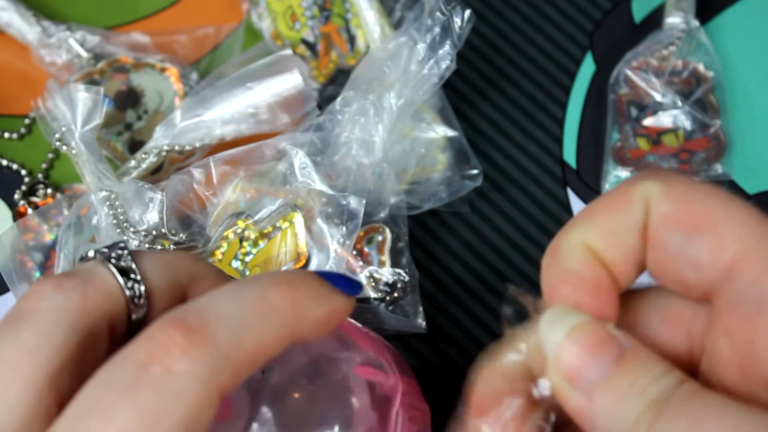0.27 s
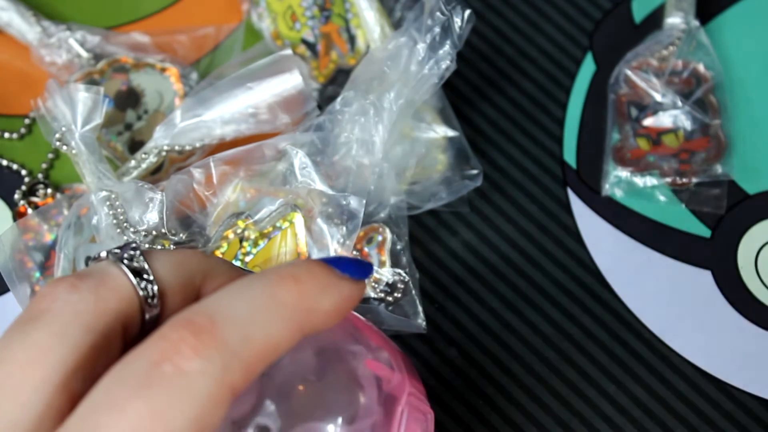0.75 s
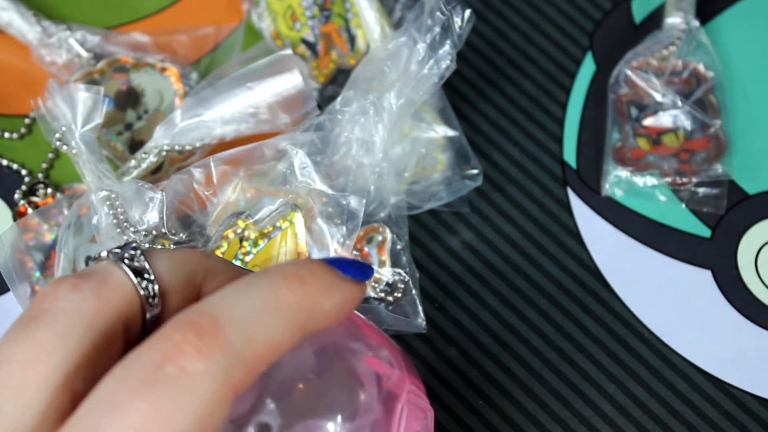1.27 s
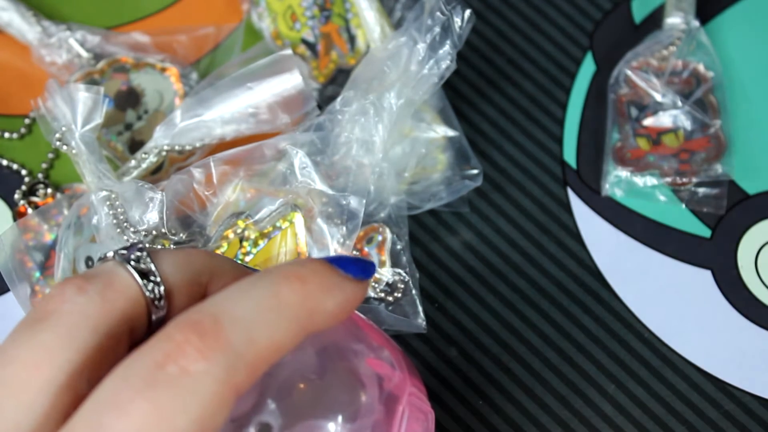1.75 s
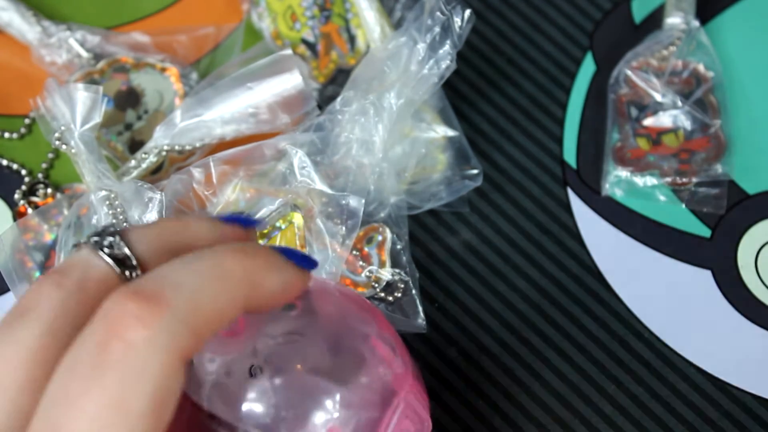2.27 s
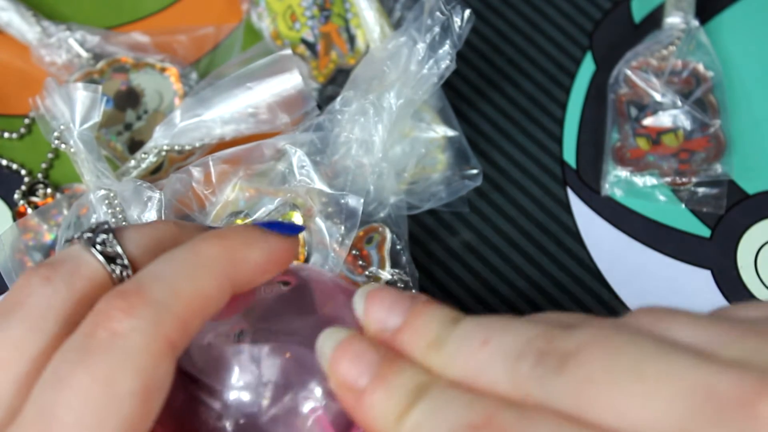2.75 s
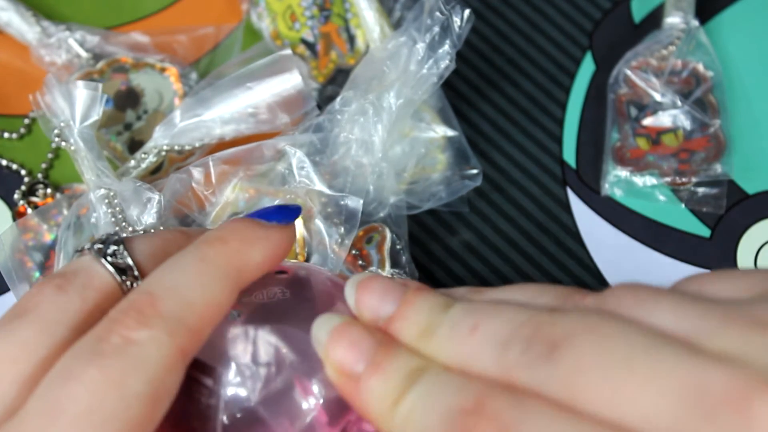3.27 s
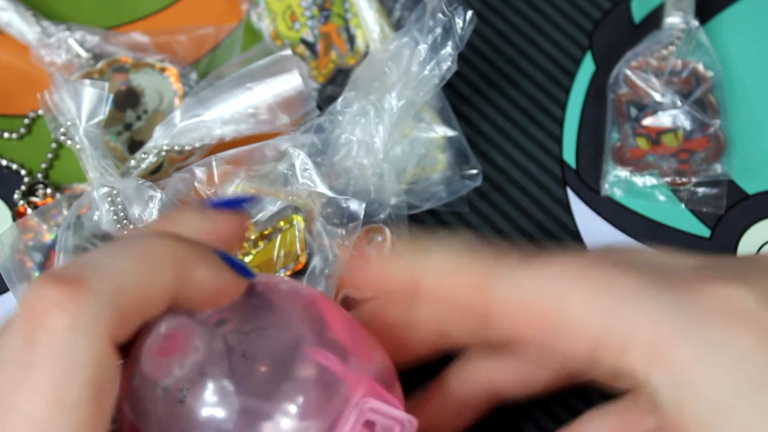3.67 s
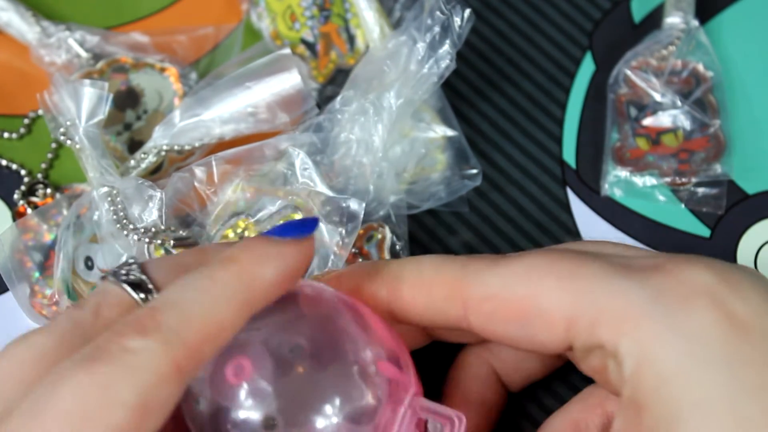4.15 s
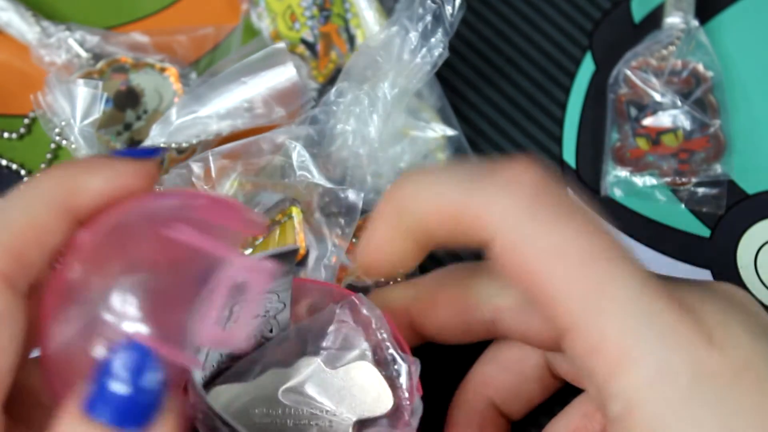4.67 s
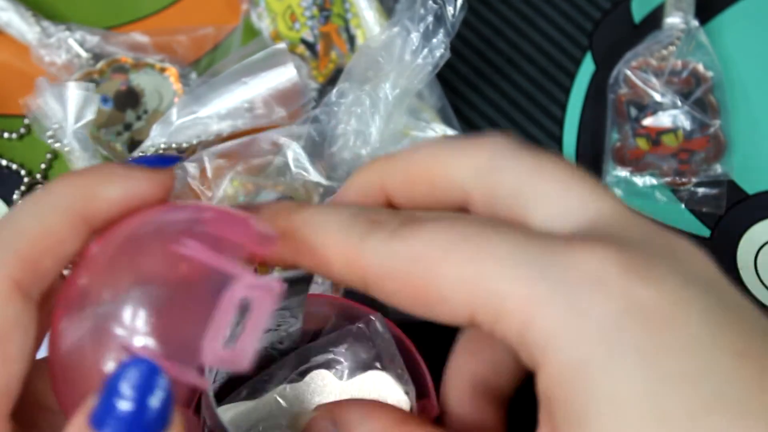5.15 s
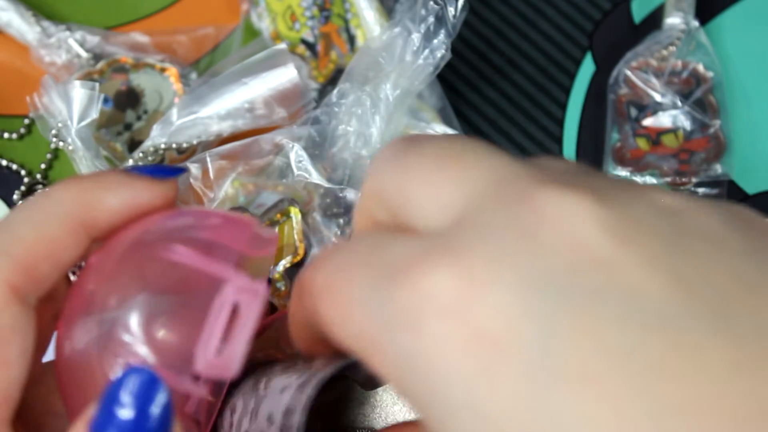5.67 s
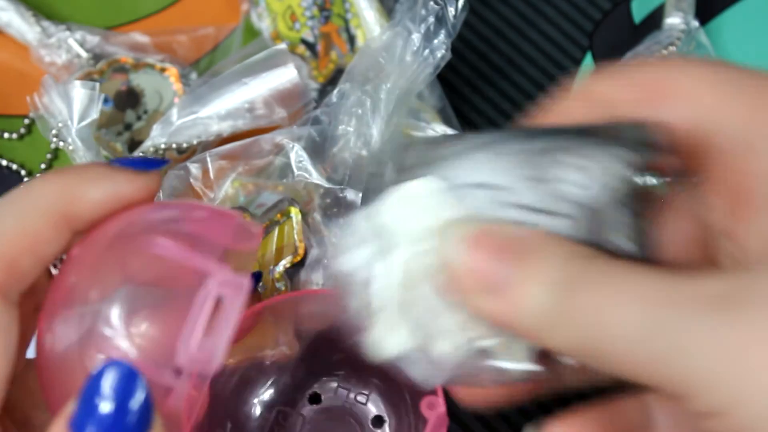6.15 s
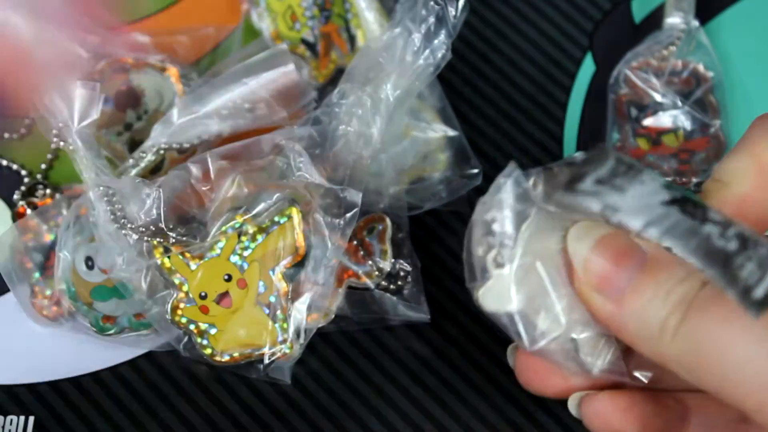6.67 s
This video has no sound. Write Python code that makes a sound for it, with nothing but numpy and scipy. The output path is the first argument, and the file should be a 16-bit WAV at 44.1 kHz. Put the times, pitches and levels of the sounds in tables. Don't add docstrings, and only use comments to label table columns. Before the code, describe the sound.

Close-up hands crackle thin film, knock and pop open a hard hollow plastic shell, then rustle a crinkly packet free in a quiet room.

```python
import sys
import numpy as np
from scipy import signal
from scipy.fft import rfft, irfft
from scipy.io import wavfile
from scipy.ndimage import uniform_filter1d

SR = 44100
rng = np.random.default_rng(int(sys.argv[2]) if len(sys.argv) > 2 else 0)


def dump_mix(stems):
    frames = np.atleast_2d(stems).T
    limited = np.clip(frames, -1, 1)
    pcm = np.round(limited * 32767).astype(np.int16)
    wavfile.write(sys.argv[1], SR, pcm)


def elevation(decibels):
    levels = np.asarray(decibels, float)
    return 10 ** (levels / 20)


N = 304466

# freq_hz, density_db_per_hz
HISS_SPECTRUM = [(12, -31), (22, -13), (33, -11), (45, -18), (96, -14.5), (134, -10), (204, -16),
                 (248, -13), (377, -14.5), (558, -13), (1260, -15), (3440, -17), (4060, -17.5),
                 (16000, -29.5)]
HISS_DB = -56.5
DC_OFFSET = 0.001
# start_s, end_s, pitch_hz, rms_db
WHISTLES = [
    (1.84, 1.96, 3140, -73),
    (1.97, 2.13, 3360, -72),
]

# delay_s, level_db
ECHOES = [(.0024, -6), (.0051, -12.5), (0.0115, -15.5), (.019, -20)]
# centre_hz, t60_s, level_db
ROOM_TAIL = [(250, 0.48, -22.5), (900, 0.23, -23), (2550, 0.24, -20), (7360, 0.29, -21.5),
             (13000, 0.16, -68)]

# start_s, peak_db, centre_hz, length_s
MAT_THUMPS = [(0.251, -35, 396, 0.067), (0.617, -28, 443, 0.065), (0.638, -32, 680, 0.12),
              (0.679, -45, 235, 0.059), (1.016, -48.5, 190, 0.035), (1.355, -36, 650, 0.068),
              (1.552, -41, 217, 0.026), (1.555, -40, 604, 0.05), (2.537, -43, 553, 0.16),
              (2.598, -47, 110, 0.13), (2.72, -36.5, 623, 0.025), (3.106, -22, 593, 0.014),
              (3.895, -47, 333, 0.37), (4.074, -30, 500, 0.013), (5.035, -26, 495, 0.026),
              (5.241, -38, 483, 0.061), (6.198, -56, 112, 0.089), (6.29, -36, 374, 0.12),
              (6.318, -35, 402, 0.045), (6.5, -46.5, 297, 0.13), (6.765, -46.5, 310, 0.052)]
# start_s, peak_db, centre_hz, length_s
TABLE_THUDS = [(0.623, -41.5, 117, 0.059), (2.716, -51, 96.9, 0.085), (3.102, -38.5, 125, 0.092),
               (4.073, -56, 112, 0.048), (4.215, -55, 94, 0.068), (5.03, -49.5, 126, 0.12),
               (5.26, -53, 119, 0.12), (1.56, -51, 169, 0.032), (.27, -53, 150, 0.033),
               (3.27, -55, 110, 0.048), (6.313, -42, 84, 0.12), (6.799, -54.5, 134, 0.085),
               (2.95, -55, 75, 0.06), (3.11, -57, 250, 0.32)]
# mode_hz, width_hz, level_db
TABLE_MODES = [(123, 16, 3), (241, 7.6, 8.5), (500, 88, -5.5)]

# middle_s, length_s, level_db
SLIDE_STROKES = [
    (6.3, 0.5, -49.5),
]
# mode_hz, width_hz, level_db
SLIDE_MODES = [(547, 32, 0.5), (1590, 100, -4.5), (1910, 60, -1.5), (2400, 61, -8), (3310, 83, -9)]

# middle_s, length_s, level_db
DRAG_STROKES = [(.26, 0.22, -60), (.62, 0.2, -52.5), (.93, 0.99, -60), (1.27, 0.45, -78),
                (1.6, 0.16, -58.5), (2.75, 1, -63), (3.45, 0.77, -52.5), (3.92, 0.26, -57),
                (4.17, 0.31, -52), (4.6, 0.43, -69), (5.09, 0.25, -49.5), (5.3, 0.18, -74),
                (5.8, 0.66, -46), (6.3, 0.58, -51), (6.85, 0.27, -63)]
# middle_s, length_s, level_db
CRUMPLE_STROKES = [(.04, 0.74, -51.5), (.34, 0.19, -42.5), (.6, 0.32, -44.5), (.95, 0.12, -39.5),
                   (1.08, 0.12, -43.5), (1.17, 0.12, -44.5), (1.25, 0.092, -43.5), (1.37, 0.15, -38),
                   (1.68, 0.12, -41.5), (2.8, 0.66, -51), (3.17, 0.18, -50), (3.57, 0.35, -51),
                   (3.8, 0.29, -50.5), (4.19, 0.51, -48), (4.6, 0.68, -53.5), (5.09, 0.28, -41),
                   (5.28, 0.3, -47), (5.53, 0.27, -47.5), (5.71, 0.31, -41), (5.96, 0.3, -40.5),
                   (6.3, 0.36, -48), (6.48, 0.23, -51), (6.85, .2, -57)]
# mode_hz, width_hz, level_db
FILM_MODES = [(2000, 1570, 2.5), (3430, 2400, 1), (5130, 2500, -7.5)]
REST_DB = -71.5
SHEEN_DB, SHEEN_REST_DB = -12.5, -61.5
CUP_HZ, CUP_WIDTH_HZ, CUP_DB, CUP_OPEN_S = 2300, 750, 4.5, 4.5
PATCH_RATE_HZ, PATCH_DB = 70, 3

# middle_s, length_s, level_db
CREAK_STROKES = [(3.26, 0.047, -56), (3.32, 0.054, -58), (3.38, 0.061, -50), (3.435, 0.038, -53),
                 (3.47, 0.032, -44), (3.52, 0.077, -44), (3.66, 0.044, -56), (3.73, 0.06, -50),
                 (3.8, 0.056, -52.5), (3.89, 0.061, -55), (4.095, 0.028, -48), (4.13, 0.035, -57),
                 (4.176, .035, -47), (4.24, .07, -48), (4.29, 0.084, -65), (5.065, 0.037, -56)]
# mode_hz, width_hz, level_db
CREAK_MODES = [(896, 130, 5), (1060, 150, -6), (1290, 160, -11), (1640, 150, 0)]

# start_s, length_s, centre_hz, level_db
FIZZES = [(0.16, .006, 3000, -49), (0.22, 0.018, 5000, -56), (0.5565, .003, 10500, -36),
          (0.5666, 0.0064, 4560, -35.5), (.581, .006, 11100, -37.5), (0.792, 0.023, 650, -50),
          (1.019, 0.0073, 1200, -47.5), (1.061, 0.044, 1350, -53), (1.175, .018, 2000, -56),
          (1.204, .02, 7200, -51), (1.233, .01, 1300, -49.5), (1.4, 0.0069, 690, -43.5),
          (3.515, 0.018, 3300, -44), (3.559, .014, 4500, -49), (4.217, 0.036, 3900, -43),
          (4.241, 0.028, 1600, -47), (5.483, 0.0088, 2400, -41), (5.495, .006, 12000, -48),
          (5.897, 0.011, 12500, -38), (5.9, 0.01, 3000, -42), (5.964, 0.0043, 13000, -42),
          (5.998, 0.0055, 12500, -40), (6.003, 0.013, 13000, -30.5), (6.01, 0.0053, 7800, -38),
          (6.018, .004, 5000, -35)]

# mode_hz, width_hz, level_db
POP_MODES = [(2200, 630, -1), (2600, 330, -0.5), (4550, 1140, 0.5), (5080, 650, 2.5), (5600, 370, -2.5),
             (6500, 1100, -16)]
POP_S, POP_DB, POP_ROOM_DB = 6.0374, 15, -7

# start_s, body_db, treble_db
RIP_STEPS = [
    (0.2478, -11, -13),
    (0.2525, -9.5, -17),
    (0.2575, -8, -9.5),
    (.2624, -8, -22),
    (0.2673, -13.5, -8.5),
    (0.2734, -8, -14),
    (0.2773, -12.5, -7),
    (0.2821, -11, -11.5),
]
# mode_hz, width_hz, level_db
RIP_BODY_MODES = [(980, 160, -5), (1300, 330, -10.5), (1745, 220, 2), (2600, 330, -6.5), (3150, 410, -9.5)]
# mode_hz, width_hz, level_db
RIP_TREBLE_MODES = [(4900, 670, -1.5), (6880, 600, 3.5), (8900, 2000, -3.5), (11600, 1700, -2.5),
                    (14700, 2100, -4)]
RIP_ROOM_DB = -2

# start_s, level_db
DROP_SLIPS = [
    (1.6433, 1),
    (1.6454, -7.5),
]
# mode_hz, width_hz, level_db
DROP_MODES = [(530, 240, -4.5), (1790, 230, 0.5), (2030, 250, -2), (2650, 300, 0.5), (3400, 400, -7),
              (4300, 690, -11.5)]
# level_db, chatter_share, top_hz, room_db
DROP_SETTINGS = (2.5, 0.23, 9000, -1.5)

# start_s, level_db
CUP_SLIPS = [
    (5.0325, 2.5),
    (5.0357, -8),
    (5.0389, -9),
    (5.0465, -10),
]
# mode_hz, width_hz, level_db
CUP_MODES = [(479, 125, 0), (810, 130, 7), (1250, 220, 0.5), (1530, 250, -2), (1840, 250, -5),
             (2450, 340, -17)]
# level_db, chatter_share, top_hz, room_db
CUP_SETTINGS = (5, 0.16, 2600, -6)

# start_s, level_db
CATCH_SLIPS = [
    (3.1022, -3),
    (3.1037, -10),
    (3.1058, -0.5),
    (3.1074, -8.5),
    (3.1092, -7),
    (3.1108, -4.5),
    (3.1125, -8),
    (3.1140, -12),
    (3.1156, -6.5),
]
# mode_hz, width_hz, level_db
CATCH_MODES = [(250, 34, -5), (885, 130, -1), (1200, 100, 2), (1750, 310, 2.5), (2190, 320, -5.5),
               (2650, 300, -3), (3160, 250, 1.5), (3680, 220, -13), (4550, 430, -18), (6150, 490, -17)]
# level_db, chatter_share, top_hz, room_db
CATCH_SETTINGS = (7.5, 0.31, 8500, -3.5)

# mode_hz, level_db, t60_s
SNAP_MODES = [(587, -4, 0.19), (463, -19, 0.2), (1760, -4, 0.2), (2110, -8, 0.56), (2330, -1, 0.24),
              (2570, -9, 0.27), (2900, -8, 0.2), (3200, -9.5, 0.47), (3860, 2, 0.13), (4400, -11, 0.24),
              (5120, -7, 0.21)]
SNAP_S, SNAP_DB = 3.106, -31.5

# start_s, hollow_hz, hollow_peak_db, crack_peak_db
KNOCKS = [(2.819, 896, -37.5, -42), (3.2413, 1040, -28.5, -56), (3.2902, 870, -47, -55),
          (3.345, 900, -47, -55), (3.416, 1000, -26.5, -41), (3.4621, 945, -28, -56),
          (3.472, 1120, -19.5, -50), (3.478, 1060, -33, -36), (3.525, 1250, -32.5, -37),
          (3.642, 1035, -31.5, -41), (3.7087, 1074, -20, -35), (3.788, 1180, -37, -56),
          (3.8096, 980, -42, -50), (3.848, 1040, -41, -53), (3.8824, 1080, -35, -56),
          (4.0744, 1130, -21.5, -52), (4.1154, 1160, -25, -42), (4.1736, 1130, -31.5, -54),
          (4.2137, 1160, -31, -46), (4.2165, 1110, -18, -22.5), (4.2239, 1130, -23, -37),
          (4.2272, 1300, -23.5, -34), (4.2341, 1330, -24.5, -38), (4.2195, 900, -26.5, -50)]
KNOCK_WALL_HZ, KNOCK_WALL_DB = 1500, -19
# start_s, wall_hz, wall_peak_db, crack_peak_db
SHELL_CLICKS = [(0.2328, 5100, -39, -46), (.2369, 3320, -21, -40), (2.5486, 1870, -33, -28),
                (2.569, 2320, -40, -51), (2.6435, 3080, -44.5, -41), (2.723, 3200, -33, -40),
                (2.819, 1760, -35.5, -60), (2.9465, 3160, -34, -58), (3.1021, 1760, -16, -28),
                (3.1092, 6800, -22, -26), (3.3563, 1700, -34.5, -38), (3.472, 3300, -24.5, -29),
                (3.478, 3850, -25.5, -28), (3.5248, 1750, -35, -54), (3.5742, 2950, -32.5, -47),
                (3.6194, 2770, -22.5, -25), (3.982, 1630, -40.5, -58), (4.215, 2600, -37, -45),
                (4.241, 1530, -34, -45), (4.541, 2640, -46, -45), (4.616, 3200, -39, -49),
                (4.7364, 2140, -41, -43), (5.0302, 3900, -31, -43), (5.0613, 2450, -27, -50)]
SHELL_HOLLOW_HZ, SHELL_HOLLOW_DB = 980, -11
# start_s, ring_hz, ring_peak_db, crack_peak_db
LOOSE_TICKS = [(0.019, 4440, -28.5, -38), (0.1658, 3200, -22.5, -18), (0.2365, 1770, -18, -15.5),
               (0.3291, 3800, -24, -33), (0.558, 3150, -35, -43), (0.5652, 2900, -24.5, -26),
               (0.582, 3310, -44, -31), (0.6051, 1840, -35, -27), (0.6896, 2490, -37, -62),
               (0.793, 2840, -36, -30.5), (0.806, 1900, -34.5, -33), (0.834, 5260, -33, -23.5),
               (0.854, 3680, -37, -27.5), (0.9151, 2330, -33, -28), (0.945, 2440, -29.5, -20.5),
               (1.0652, 2900, -40, -37), (1.2437, 2900, -35, -39), (1.2615, 3050, -36, -51),
               (1.3182, 2570, -37, -26.5), (1.3275, 3130, -37, -38), (1.3566, 1590, -32.5, -28),
               (1.365, 2720, -30, -41), (1.376, 2570, -30.5, -23), (1.3867, 1580, -35.5, -25.5),
               (1.401, 2630, -39, -48), (1.5529, 3900, -33, -52), (1.5695, 980, -39, -29),
               (1.6438, 5700, -38, -14), (1.6958, 3400, -35, -41)]
# start_s, ring_hz, ring_peak_db, crack_peak_db
CRACKLES = [(.575, 2480, -34, -34), (0.8323, 1820, -33.5, -50), (.845, 3020, -34.5, -32),
            (.9465, 5500, -40, -40), (.975, 2300, -57, -33), (1.5196, 1580, -45, -38),
            (1.5575, 1350, -38.5, -45), (1.565, 2300, -36, -46), (1.717, 2700, -48, -50),
            (3.289, 2300, -46, -55), (3.6199, 1570, -32, -50), (3.621, 3770, -39, -45),
            (3.7865, 3260, -44.5, -57), (3.9832, 3880, -45, -59), (4.074, 3820, -50, -55),
            (4.1158, 3370, -37.5, -48), (4.252, 1610, -42, -45), (4.425, 1970, -51, -60),
            (4.9835, 1980, -42, -55), (5.021, 2300, -38, -55), (5.2482, 6800, -26, -45),
            (5.275, 6000, -44, -50), (5.3293, 4500, -48, -55), (5.348, 3690, -47, -55),
            (5.363, 4670, -42, -55), (5.464, 3780, -46, -55), (5.491, 4900, -29, -50),
            (5.562, 3830, -57, -55), (5.6267, 7200, -25.5, -45), (5.83, 5220, -33, -50),
            (5.858, 4460, -24.5, -50), (5.9129, 5300, -19, -45), (5.9643, 4890, -29, -45),
            (5.99, 3860, -37, -50), (6.046, 5100, -43, -50), (6.065, 4970, -54, -55)]
LOOSE_KNOCK_HZ, LOOSE_KNOCK_DB, CRACKLE_KNOCK_DB = 1160, -16, -23
# start_s, ring_hz, ring_peak_db, crack_peak_db
BAG_TICKS = [(5.2495, 1890, -25.5, -35), (5.606, 5100, -35, -46), (5.6973, 3830, -25.5, -23.5),
             (5.73, 5200, -32.5, -52), (5.8486, 1590, -36, -34), (5.878, 1490, -34, -28),
             (5.907, 4300, -21.5, -42), (5.999, 5600, -27, -34), (6.0185, 5130, -38, -43),
             (6.037, 5200, -24, -12), (6.036, 1810, -24.5, -45), (6.209, 6100, -47, -26.5),
             (6.232, 4900, -29, -38), (6.243, 5730, -25.5, -21.5), (6.264, 3400, -36, -53),
             (6.354, 4900, -32, -55), (6.377, 4300, -41, -54), (6.485, 2850, -37, -42),
             (6.77, 1920, -41, -40), (6.804, 4420, -35.5, -61), (6.832, 2110, -42, -60)]
# start_s, ring_peak_db, crack_peak_db
RIM_TICKS = [(5.1, -31.5, -31), (5.1238, -37, -45), (5.148, -39, -50), (5.156, -29, -30.5),
             (5.2484, -24.5, -30), (5.36, -32, -50), (5.4902, -21, -45), (5.495, -40, -36),
             (5.582, -41, -52), (5.6263, -23, -37), (5.6756, -42, -56), (5.754, -33, -51),
             (5.781, -30, -26), (5.7857, -29, -48), (5.8204, -39, -30.5), (5.83, -28, -41),
             (5.8366, -33, -33), (5.858, -18, -44), (5.902, -36, -30), (5.9137, -22, -26),
             (5.918, -13, -34), (5.959, -23, -43), (5.9643, -31, -34), (5.9837, -26.5, -36),
             (5.9902, -23.5, -30), (6.006, -28, -32), (6.012, -30, -36), (6.025, -36, -44),
             (6.1706, -35, -36)]
RIM_HZ, RIM_SCATTER = 2300, 0.05
BAG_PULL_S, CUP_KNOCK_HZ, CUP_KNOCK_DB, CUP_KNOCK_DB_PER_S, CUP_KNOCK_LAST_DB = 5.104, 968, -5, -27, -39


def band(x, lo_hz, hi_hz, order=2):
    edges_hz = [lo_hz, min(hi_hz, 0.49 * SR)]
    return signal.sosfilt(signal.butter(order, edges_hz, "bandpass", fs=SR, output="sos"), x)


def unit(x):
    return x / np.sqrt(np.mean(x ** 2))


def fade(t, t60_s):
    return np.exp(-np.log(1000) * t / t60_s)


def resonate(x, modes, order=1):
    return sum(elevation(db) * band(x, hz - width / 2, hz + width / 2, order=order) for hz, width, db in modes)


def grains(rate_hz, spread_db):
    slips = (rng.random(N) < rate_hz / SR) * rng.standard_normal(N)
    return slips * elevation(spread_db * np.minimum(rng.exponential(size=N), 3.0))


def strokes(table):
    now = np.arange(N) / SR
    power = sum(elevation(db) ** 2 * np.exp(-(3.58 * (now - s) / length) ** 2) for s, length, db in table)
    return 10 * np.log10(power + elevation(REST_DB) ** 2)


def patches():
    size = int(SR / PATCH_RATE_HZ)
    steps = np.repeat(rng.standard_normal(N // size + 1), size)[:N]
    smooth = uniform_filter1d(steps, size=size // 2)
    return unit(elevation(PATCH_DB * unit(smooth)))


def rooms(count):
    t = np.arange(8192) / SR
    starts = rng.integers(0, N - len(t), count)
    reply = np.zeros((count, len(t)))
    reply[:, 0] = 1
    for delay_s, db in ECHOES:
        smear = rng.standard_normal((count, 512)) * fade(t[:512], 2.05 * delay_s)
        smear /= np.sqrt(np.sum(smear ** 2, axis=1))[:, None]
        i = int(delay_s * SR)
        reply[:, i:i + 512] += elevation(db) * smear
    for hz, t60_s, db in ROOM_TAIL:
        air = unit(band(rng.standard_normal(N), hz / 2.5, hz * 1.35))
        pieces = air[starts[:, None] + np.arange(len(t))]
        reply += elevation(db - 25.0) * pieces * fade(t, t60_s) * (1 - np.exp(-t / 0.00055))
    return reply


def in_room(x, room_db):
    wet = signal.fftconvolve(x, rooms(1)[0])[:N]
    return x + elevation(room_db) * (wet - x)


def hiss():
    hz, db = np.transpose(HISS_SPECTRUM)
    f = np.fft.rfftfreq(N, 1 / SR) + 1
    shape = elevation(np.interp(np.log(f), np.log(hz), db))
    return elevation(HISS_DB) * unit(irfft(rfft(rng.standard_normal(N)) * shape, N))


def whistle():
    out, t = np.zeros(N), np.arange(N) / SR
    for start, end, hz, db in WHISTLES:
        swell = np.sin(np.pi * np.clip((t - start) / (end - start), 0, 1))
        waver = 0.87 * np.sin(2 * np.pi * 13 * t)
        out += 2 * elevation(db) * swell * np.sin(2 * np.pi * hz * t + waver)
    return out


def thumps():
    out, t = np.zeros(N + 12288), np.arange(12288) / SR
    hits = MAT_THUMPS + TABLE_THUDS
    for (s, db, hz, length), noise in zip(hits, rng.standard_normal((len(hits), 12288))):
        span = max(length, 0.005)
        bumps = noise ** 3 * (np.abs(noise) > 2.2) + 0.5 * noise
        swell = (1 - np.exp(-t / (0.076 * span))) * np.exp(-3 * t / span)
        blow = band(bumps * swell, hz / 1.78, hz * 2.28, order=3)
        i = int(s * SR)
        out[i:i + 12288] += elevation(db - 0.5) * blow / np.abs(blow).max()
    return out[:N] + resonate(out[:N], TABLE_MODES)


def slide():
    level = elevation(strokes(SLIDE_STROKES)) - elevation(REST_DB)
    return level * unit(resonate(grains(1500, 1.3), SLIDE_MODES))


def hands():
    now = np.arange(N) / SR
    hollow_db, film_db = strokes(DRAG_STROKES), strokes(CRUMPLE_STROKES)
    treble_db = 10 * np.log10(elevation(film_db + SHEEN_DB) ** 2 + elevation(SHEEN_REST_DB) ** 2)
    slips = grains(1500, 3.2) + 0.32 * rng.standard_normal(N)
    hollow = unit(band(slips, 830, 1360) + 1.1 * band(slips, 430, 2350))
    cup = band(slips, CUP_HZ - CUP_WIDTH_HZ / 2, CUP_HZ + CUP_WIDTH_HZ / 2) * (now > CUP_OPEN_S)
    film = unit(resonate(slips, FILM_MODES, order=2) + elevation(CUP_DB) * cup)
    treble = unit(band(grains(5000, 0.83) + 2.2 * rng.standard_normal(N), 11700, 22500))
    rumble = unit(band(grains(900, 0.71), 197, 614))
    return (elevation(hollow_db - 2.5) * hollow
            + elevation(film_db - 7.5) * film * patches()
            + elevation(treble_db - 2.5) * treble
            + elevation(0.55 * hollow_db - 30.0) * rumble)


def creaks():
    slips = band(grains(1100, 1.8), 720, 1730, order=3)
    level = elevation(strokes(CREAK_STROKES)) - elevation(REST_DB)
    return level * unit(resonate(slips, CREAK_MODES))


def fizzes():
    out, t = np.zeros(N + 4096), np.arange(4096) / SR
    for (s, length, hz, db), noise in zip(FIZZES, rng.standard_normal((len(FIZZES), 4096))):
        grit = unit(band(noise * np.abs(noise), hz / 1.25, hz * 1.3))
        swell = np.sin(np.pi * np.clip(t / max(length, 0.002), 0, 1) ** 0.7)
        i = int(s * SR)
        out[i:i + 4096] += elevation(db) * grit * swell
    return in_room(out[:N], -1.5)


def pop():
    pulse = np.zeros(N)
    pulse[int(POP_S * SR)] = elevation(POP_DB)
    return in_room(band(resonate(pulse, POP_MODES, order=2), 1400, 12500), POP_ROOM_DB)


def rip():
    pulses, t = np.zeros((2, N)), np.arange(256) / SR
    for (s, *levels_db), noise in zip(RIP_STEPS, rng.standard_normal((len(RIP_STEPS), 256))):
        slip = 0.13 * noise * fade(t, 0.0074)
        slip[0] = -1
        i = int(s * SR)
        pulses[:, i:i + 256] += elevation(levels_db)[:, None] * slip
    body = band(resonate(pulses[0], RIP_BODY_MODES), 770, 4000)
    treble = resonate(pulses[1], RIP_TREBLE_MODES, order=2)
    return in_room(elevation(23.5) * body + elevation(17.5) * treble, RIP_ROOM_DB)


def blows(slips, modes, level_db, chatter_share, top_hz, room_db):
    out, t = np.zeros(N), np.arange(128) / SR
    for (s, slip_db), noise in zip(slips, rng.standard_normal((len(slips), 128))):
        slip = chatter_share * noise * fade(t, 0.006)
        slip[0] = -1
        i = int(s * SR)
        out[i:i + 128] += elevation(level_db + slip_db) * slip
    return in_room(band(resonate(out, modes), 174, top_hz), room_db)


def dropped_bit():
    return blows(DROP_SLIPS, DROP_MODES, *DROP_SETTINGS)


def cup_set_down():
    return blows(CUP_SLIPS, CUP_MODES, *CUP_SETTINGS)


def catch_grind():
    return blows(CATCH_SLIPS, CATCH_MODES, *CATCH_SETTINGS)


def snap_ring():
    t = np.arange(16384) / SR
    shake = rng.standard_normal((len(SNAP_MODES), len(t)))
    out, i = np.zeros(N), int(SNAP_S * SR)
    for (hz, db, t60_s), noise in zip(SNAP_MODES, shake):
        mode = unit(band(noise, hz / 1.015, hz * 1.015, order=1))
        out[i:i + len(t)] += elevation(SNAP_DB + db - 2.5) * mode * fade(t, min(t60_s, 0.45))
    return out


def cup_knock_db(s):
    return max(CUP_KNOCK_DB + CUP_KNOCK_DB_PER_S * (s - BAG_PULL_S), CUP_KNOCK_LAST_DB)


def contacts():
    scatter = rng.standard_normal(len(RIM_TICKS))
    rim = [(s, RIM_HZ * (1 + RIM_SCATTER * r), db, crack) for (s, db, crack), r in zip(RIM_TICKS, scatter)]
    return ([(s, hz, db, KNOCK_WALL_HZ, db + KNOCK_WALL_DB, crack) for s, hz, db, crack in KNOCKS]
            + [(s, SHELL_HOLLOW_HZ, db + SHELL_HOLLOW_DB, hz, db, crack) for s, hz, db, crack in SHELL_CLICKS]
            + [(s, LOOSE_KNOCK_HZ, db + LOOSE_KNOCK_DB, hz, db, crack) for s, hz, db, crack in LOOSE_TICKS]
            + [(s, LOOSE_KNOCK_HZ, db + CRACKLE_KNOCK_DB, hz, db, crack) for s, hz, db, crack in CRACKLES]
            + [(s, CUP_KNOCK_HZ, db + cup_knock_db(s), hz, db, crack) for s, hz, db, crack in rim + BAG_TICKS])


def ring(t, hz, t60_s, rough, spread, noise):
    ratios = np.exp(spread * np.clip(noise[-6:] - noise[-6:].mean(), -1.5, 1.5))
    modes = np.sin(2 * np.pi * hz * t) * fade(t, t60_s)
    for ratio in ratios:
        level = elevation(-10.5 - 19.0 * abs(np.log(ratio)))
        modes += level * np.sin(2 * np.pi * hz * ratio * t) * fade(t, t60_s * 1.66 / ratio)
    push = rough * noise * fade(t, 0.0015)
    push[0] = 3
    out = signal.fftconvolve(modes * (1 - np.exp(-t * hz * 3)), push)[:len(t)]
    return out / np.abs(out).max()


def ticks():
    out, t = np.zeros(N + 16384), np.arange(3072) / SR
    hits = contacts()
    chance = rng.standard_normal((len(hits), 4, 3072))
    for hit, noises, reply in zip(hits, chance, rooms(len(hits))):
        s, hollow_hz, hollow_db, wall_hz, wall_db, crack_db = hit
        hollow_noise, wall_noise, broad_noise, crack_noise = noises
        scuff = np.clip(-wall_db / 30, 0.2, 1.3)
        rise = 1 - np.exp(-t / (0.00014 * scuff ** 2))
        broad_fade = fade(t, 0.0094 * scuff) + 2.0 * scuff * fade(t, 0.025)
        broad = band(rise * broad_noise * broad_fade, wall_hz / 1.67, min(wall_hz * 2, 8000))
        wall = ring(t, wall_hz, 22 / wall_hz, 1.0, 0.15, wall_noise)
        wall += 0.57 * scuff * broad / np.abs(broad).max()
        crack_fade = fade(t, 0.0034 * scuff) + 0.13 * scuff * fade(t, 0.04)
        crack = band(rise * crack_noise * crack_fade, 2500, 18100)
        tick = elevation(hollow_db) * ring(t, hollow_hz, 0.022, 0.73, 0.12, hollow_noise)
        tick += elevation(wall_db + 1.5) * wall
        tick += elevation(crack_db) * crack / np.abs(crack).max()
        heard = signal.fftconvolve(tick, reply)
        i = int(s * SR)
        out[i:i + len(heard)] += heard
    return band(out[:N], 525, 25500, order=3)


def scene():
    background = hiss() + whistle()
    table = thumps() + slide() + dropped_bit() + cup_set_down()
    film = hands() + fizzes() + pop() + rip()
    shell = creaks() + catch_grind() + snap_ring() + ticks()
    return (background + table + film + shell)[None]


def band_limit(x):
    return signal.sosfilt(signal.butter(12, 16980, fs=SR, output="sos"), x)


def record(dry):
    top_cut = signal.ellip(8, 0.2, 45, 15800, fs=SR, output="sos")
    mix = signal.sosfilt(top_cut, dry) + DC_OFFSET
    return band_limit(mix)


dry = scene()
out = record(dry)
dump_mix(out)
```